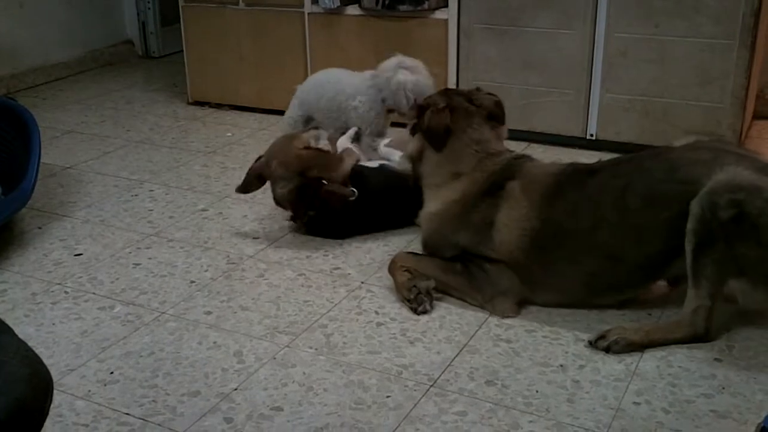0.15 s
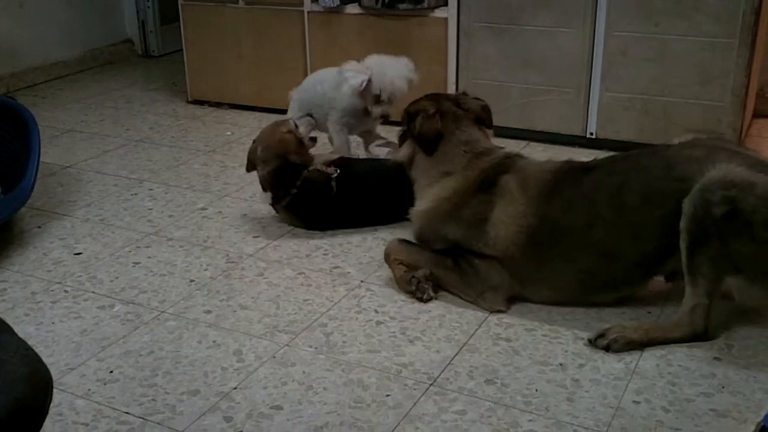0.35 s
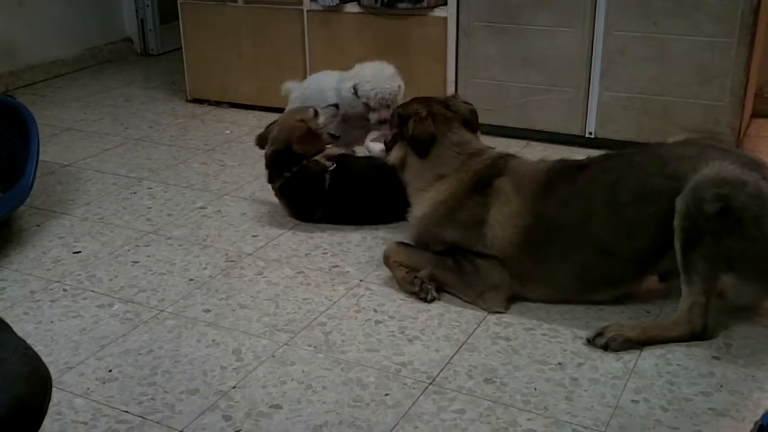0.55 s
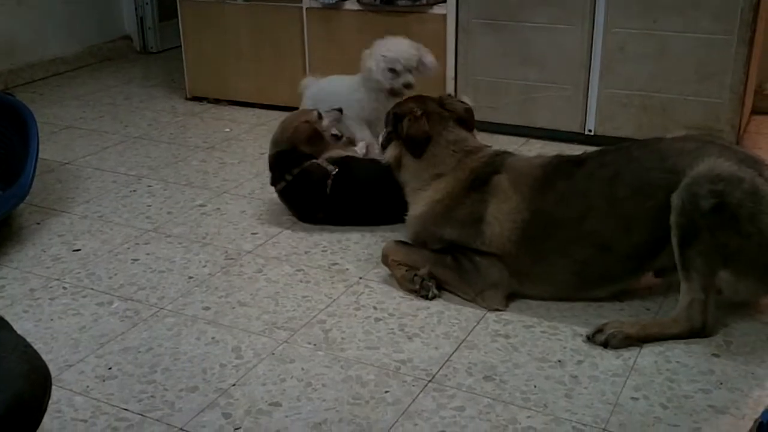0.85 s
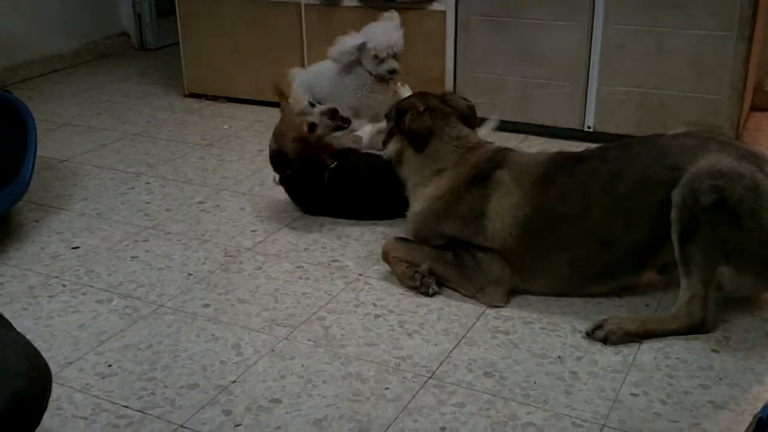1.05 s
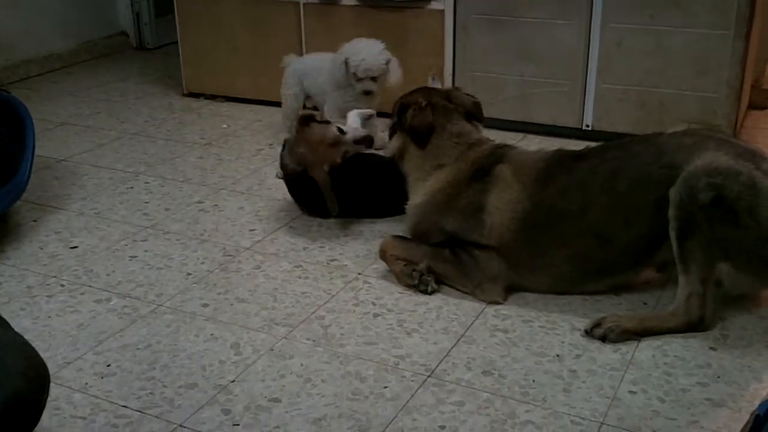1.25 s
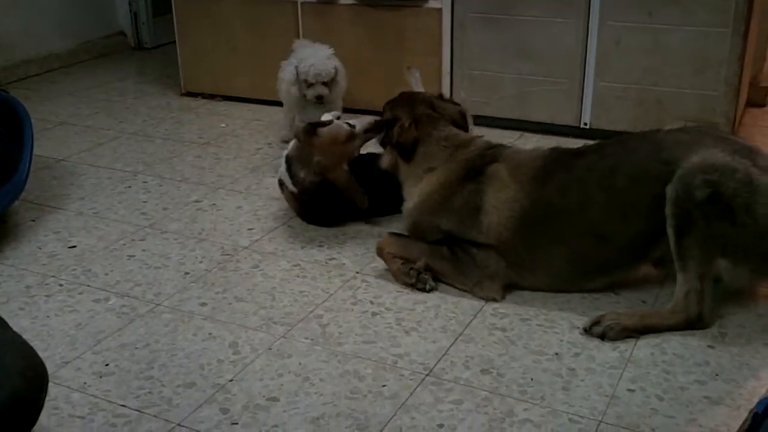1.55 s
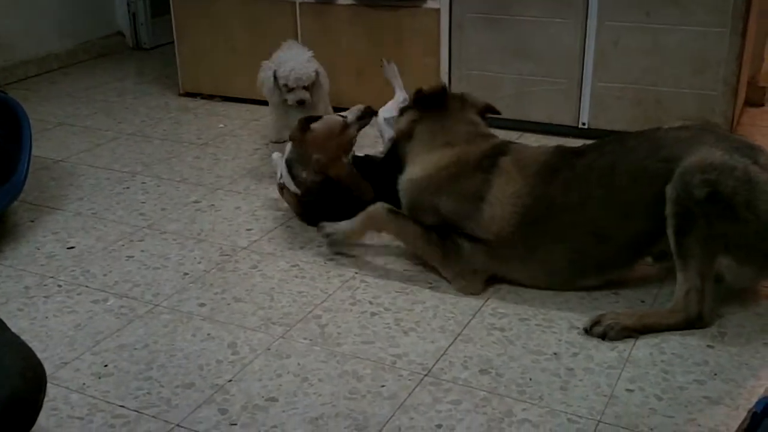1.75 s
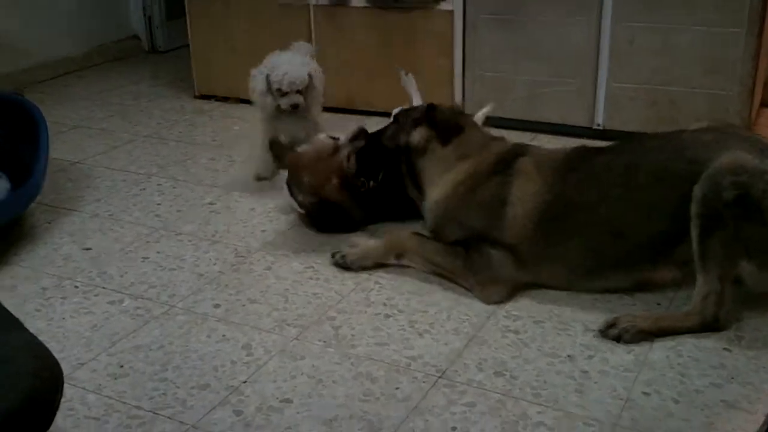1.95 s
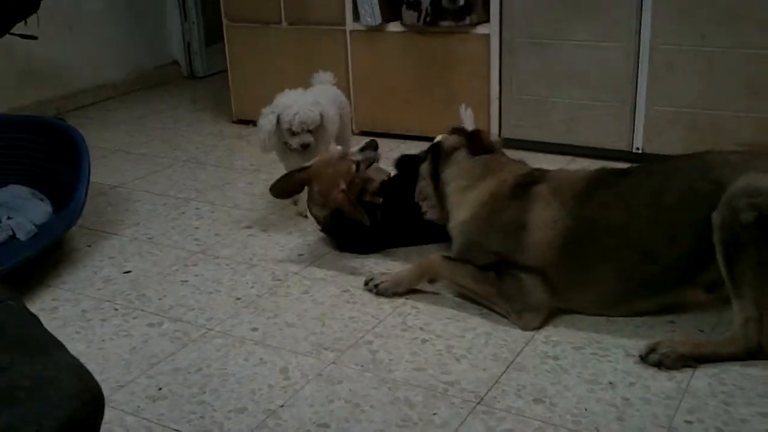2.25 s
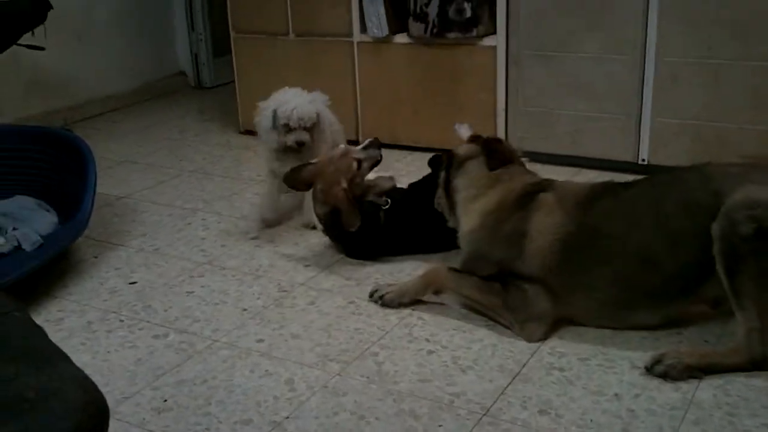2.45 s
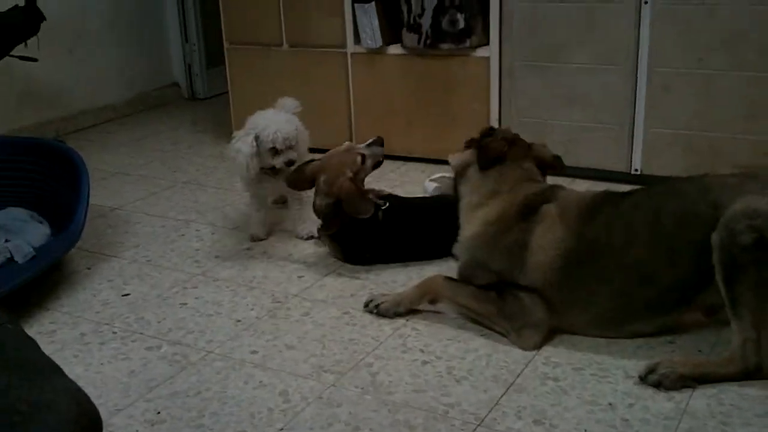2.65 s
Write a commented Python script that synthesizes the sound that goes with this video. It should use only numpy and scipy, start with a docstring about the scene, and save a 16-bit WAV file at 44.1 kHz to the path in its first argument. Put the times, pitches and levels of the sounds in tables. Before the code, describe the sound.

Playful dog growls, one long and one short, over body thumps and a jingling collar tag

```python
"""Dogs wrestling on tiles

In a small hard room one dog growls twice: a long rattle with a thin whine at both ends, then a short growl that
swells and opens into a huff. Vocal pulses and puffs of air drive throat filters. Bodies thump as low swings,
and the rumble has a few low lumps of the same shape; a collar tag rings metal modes; claw clicks, a snort of
breath, huffs and two faint paw scuffles are shaped noise. A hand-held camera adds low rumble, and microphone
notches a hollow colour."""
import sys
import numpy as np
from scipy import signal
from scipy.fft import rfft, irfft, next_fast_len
from scipy.io import wavfile
from scipy.ndimage import uniform_filter1d, map_coordinates

SR = 44100
rng = np.random.default_rng(int(sys.argv[2]) if len(sys.argv) > 2 else 0)


def digitize_waveform(pressure):
    """Quantize a signal to 16-bit integers and store it at the path in sys.argv[1].

    Rows of a 2-D input are taken as channels; values are limited to [-1, 1].
    """
    field = np.atleast_2d(pressure).T
    bounded = np.clip(field, -1, 1)
    quanta = np.round(bounded * 32767).astype(np.int16)
    wavfile.write(sys.argv[1], SR, quanta)


N = 123479


def amp(db):
    """Decibels to gain."""
    return 10 ** (np.asarray(db) / 20)


def unit(x):
    """Scale to rms 1."""
    return x / np.sqrt(np.mean(x ** 2) + 1e-20)


def decay(t, t60_s):
    """Exponential decay, 60 dB down after t60_s."""
    return np.exp(-np.log(1000) * t / t60_s)


def along(points, hz):
    """Interpolate (Hz, value) points on a log frequency axis."""
    f, v = np.transpose(points)
    return np.interp(np.log(hz + 1), np.log(f + 1), v)


def curves(rows):
    """One value per sample for each column after the time."""
    time_s, *columns = np.transpose(rows)
    return [np.interp(np.arange(N) / SR, time_s, c) for c in columns]


def during(rows):
    """Soft-edged gate over the span of a curve."""
    t = np.arange(N) / SR
    inside = (t > rows[0][0]) & (t < rows[-1][0])
    return uniform_filter1d(1. * inside, size=200)


def filtered(x, response):
    """Multiply the spectrum of x by a response of frequency."""
    size = next_fast_len(N + SR // 2)
    return irfft(rfft(x, size) * response(np.fft.rfftfreq(size, 1 / SR)), size)[:N]


def coloured(x, points):
    """Minimum-phase filter of unit energy with the given (Hz, dB) spectrum, via the folded cepstrum."""
    size = 8192
    cepstrum = irfft(np.log(amp(along(points, np.fft.rfftfreq(size, 1 / SR)))))
    cepstrum[1:size // 2] *= 2
    cepstrum[size // 2 + 1:] = 0
    impulse = irfft(np.exp(rfft(cepstrum)))
    return signal.fftconvolve(x, impulse / np.linalg.norm(impulse))[:N]


def noise(points):
    """Coloured noise of rms 1."""
    return unit(coloured(rng.standard_normal(N), points))


def wobble(rate_hz, size=N):
    """Smooth random curve through rate_hz knots a second."""
    knots = rng.standard_normal(int(size * rate_hz / SR) + 4)
    return map_coordinates(knots, [np.arange(size) * rate_hz / SR])


def room(x, wet_db):
    """Direct sound plus a hard-room tail of decaying noise, scaled to the same nominal power."""
    # room decay: freq_hz, t60_s
    room_t60 = [(150, 0.31), (700, 0.32), (2500, .38), (6000, 0.25), (14000, 0.18)]
    hz, t, bins = signal.stft(rng.standard_normal(SR // 2), SR, nperseg=256)
    bins = bins * amp(-60 * t / along(room_t60, hz)[:, None])
    tail = signal.istft(bins, SR, nperseg=256)[1]
    tail = np.pad(tail / np.linalg.norm(tail), (90, 0))  # 2 ms pre-delay
    wet = signal.fftconvolve(x, tail)[:N]
    return (x + amp(wet_db) * wet) / np.hypot(1, amp(wet_db))


def background():
    """Room air and lumpy hand-held camera rumble: coloured noise at slowly wandering levels."""
    # spectra: freq_hz, relative_db
    air_colour = [(100, 11), (300, 1.5), (500, 1), (800, 2), (1200, 0.5), (2000, -6.5), (3200, -10),
                  (4800, -11.5), (6000, -20), (9000, -29), (15000, -32)]
    rumble_colour = [(4, -35), (14, 2), (25, 2.5), (50, -2), (80, -6.5), (120, -17), (200, -26), (400, -42),
                     (1000, -79)]
    # levels: time_s, level_db
    air_db, = curves([(0, -48.5), (1.1, -48.5), (1.5, -47.5), (2.15, -49.5), (2.8, -48)])
    rumble_db, = curves([(0, -26), (.1, -35), (.27, -37.5), (.48, -39.5), (.62, -38.5), (.78, -37.5),
                         (.95, -34.5), (1.18, -41), (1.27, -29), (1.5, -42), (1.62, -31), (2.0, -35.5),
                         (2.12, -39), (2.4, -37.5), (2.56, -35), (2.8, -43.5)])
    air = amp(air_db + 1.2 * wobble(14)) * noise(air_colour)
    rumble = amp(rumble_db + 1.5 * wobble(16)) * noise(rumble_colour)
    return air + rumble


def snort():
    """A dog snorts a short breath: noise with a fast random level gives the grain."""
    # snort level: time_s, level_db
    snort_level = [(.2, -72), (.26, -46.5), (.31, -44.5), (.345, -47.5), (.39, -65)]
    # snort spectrum: freq_hz, relative_db
    snort_colour = [(800, -14), (2000, -3.5), (3300, 3), (4400, 6.5), (6000, -7), (9500, -13), (13000, -14),
                    (15500, -27)]
    level_db, = curves(snort_level)
    breath = during(snort_level) * amp(level_db + 1.1 * wobble(119.6)) * noise(snort_colour)
    return room(breath, wet_db=-4.5)


def clicks():
    """Claws and teeth crack: noise bursts that die within milliseconds."""
    # claw and tooth clicks: start_s, relative_db
    click_hits = [(0.167, -40), (0.4561, -29), (.5566, -44), (0.7577, -31), (0.769, -42.5), (.845, -35),
                  (.872, -33), (1.0286, -43), (1.1468, -49), (1.763, -19), (1.773, -33)]
    # click spectrum: freq_hz, relative_db
    click_colour = [(500, -17), (2000, 0), (3300, 1.5), (4500, 7), (6000, -4), (7500, -6), (10000, -7),
                    (14000, -10), (15500, -14)]
    out, t = np.zeros(N + SR), np.arange(SR // 10) / SR
    for start_s, relative_db in click_hits:
        burst = decay(t, t60_s=0.0039) * rng.standard_normal(len(t))
        out[round(start_s * SR):][:len(t)] += amp(relative_db - 4) * burst
    return room(coloured(out[:N], click_colour), wet_db=1.5)


def tag():
    """Each strike scrapes the collar tag on its ring and rings its modes; swinging blurs their phase."""
    # strikes: start_s, level_db, upper_modes_db
    tag_hits = [(.185, -57, 9.5), (.527, -44, 0), (.56, -41.5, 8.5), (.575, -41.5, 2), (.689, -44, -4),
                (0.744, -47.5, 4.5), (0.796, -53, 1), (0.829, -50.5, 1), (0.899, -50, 0), (0.94, -55.5, 8),
                (1.03, -38.5, -13), (1.045, -48.5, 3), (1.1432, -40.5, 1), (1.193, -51, -3),
                (1.236, -54, -10), (1.3, -59.5, -2), (1.376, -58, -1), (1.841, -59, 5)]
    # tag modes, the low pair first: freq_hz, relative_db, t60_s
    tag_modes = [(4598, -4.5, 0.17), (4630, 2.5, .22), (4861, -4.5, 0.11), (4990, -15, 0.09),
                 (11220, -18, .13), (11886, -14, .13)]
    # scrape spectrum: freq_hz, relative_db
    scrape_colour = [(2000, -24), (4200, -7), (4700, 10), (5200, -5), (6000, 5.5), (6700, -3), (7500, -21),
                     (10500, -28), (12000, -22), (13000, -30)]
    attack_s, blur_cycles, flicker_db = 0.00086, 0.056, 2.5
    scrape_db, scrape_t60_s = -9.5, .08
    rings, scrape, t = np.zeros(N + SR), np.zeros(N + SR), np.arange(SR // 2) / SR
    for start_s, hit_db, upper_db in tag_hits:
        start = round(start_s * SR)
        for k, (hz, mode_db, t60_s) in enumerate(tag_modes):
            cycles = hz * t + rng.random() + blur_cycles * wobble(205, size=len(t))
            envelope = decay(t, t60_s) * (1 - np.exp(-t / attack_s))
            flicker = amp(flicker_db * wobble(122, size=len(t)))
            gain = amp(hit_db + mode_db + upper_db * (k > 1) + rng.normal(0, 1.1))
            rings[start:][:len(t)] += gain * envelope * flicker * np.sin(2 * np.pi * cycles)
        burst = decay(t, scrape_t60_s) * rng.standard_normal(len(t))
        scrape[start:][:len(t)] += amp(hit_db + scrape_db) * burst
    return room(rings[:N] + coloured(scrape[:N], scrape_colour), wet_db=-5)


def thumps():
    """Soft bodies land on the floor, and the hand-held camera's rumble has low lumps: a brief swing under a
    Gaussian, with no ring."""
    # body thumps and low rumble lumps: centre_s, peak_db, pitch_hz
    thump_hits = [(0.109, -27.5, 35.4), (.168, -27, 30.3), (0.361, -25.5, 208), (0.368, -32, 48.6),
                  (0.559, -34, 92), (.65, -25.5, 52.4), (.84, -30.5, 60), (0.904, -25.5, 86),
                  (.918, -22.5, 103), (1.08, -25, 44.4), (1.253, -23.5, 54.3), (1.297, -24, 65.3),
                  (1.323, -14.5, 90), (1.326, -25.5, 234), (1.821, -23, 49), (2.015, -17.5, 51.6),
                  (2.015, -22.5, 148), (2.016, -25, 319), (2.042, -20.5, 40.7), (2.155, -28, 65),
                  (2.481, -24.5, 199.6), (2.487, -17, 158), (2.49, -31.5, 305), (2.505, -18, 45.6),
                  (2.544, -33.5, 68.3)]
    sigma_cycles = 0.4
    t, out = np.arange(N) / SR, np.zeros(N)
    for centre_s, peak_db, hz in thump_hits:
        cycles = (t - centre_s) * hz
        out -= amp(peak_db) * np.cos(2 * np.pi * cycles) * np.exp(-.5 * (cycles / sigma_cycles) ** 2)
    return out


def huffs_and_scuffles():
    """Huffs through open jaws, two faint paw scuffles at 0.8 and 1.05 s: noise under lopsided Gaussian swells."""
    # huffs and paw scuffles: peak_s, level_db, rise_sigma_s, fall_sigma_s
    swells = [(.8, -59, 0.041, 0.036), (1.05, -53, .025, 0.049), (1.66, -49.5, 0.057, 0.045),
              (1.955, -47, .02, 0.018), (2.412, -34, .02, 0.031), (2.68, -47.5, 0.038, 0.0271)]
    # their shared spectrum: freq_hz, relative_db
    swell_colour = [(400, -4), (800, 15.5), (1400, 1), (1950, 5.5), (3000, 2), (4500, -5.5), (6000, -14.5),
                    (9000, -31), (15000, -37)]
    t, envelope = np.arange(N) / SR, np.zeros(N)
    for peak_s, level_db, rise_s, fall_s in swells:
        sigma_s = np.where(t < peak_s, rise_s, fall_s)
        envelope += amp(level_db) * np.exp(-.5 * ((t - peak_s) / sigma_s) ** 2)
    return room(envelope * noise(swell_colour), wet_db=-1)


def whines():
    """A second, much higher throat vibration glides briefly: harmonics of one jittered pitch."""
    # whines at both ends of the long growl: start_s, length_s, start_hz, end_hz, level_db
    whine_rows = [(1.279, 0.17, 371.8, 367.6, -44.5), (1.94, .045, 339.9, 396.5, -37.5)]
    # harmonics: multiple, relative_db
    whine_partials = [(1, -10), (2, 1), (3, 2), (4, -32), (5, -22), (6, -13)]
    t, out = np.arange(N) / SR, np.zeros(N)
    for start_s, length_s, start_hz, end_hz, level_db in whine_rows:
        progress = np.clip((t - start_s) / length_s, 0, 1)
        hz = (start_hz + (end_hz - start_hz) * progress) * (1 + 0.0144 * wobble(150))
        cycles = np.cumsum(hz) / SR
        tone = sum(amp(db) * np.sin(2 * np.pi * round(k) * cycles) for k, db in whine_partials)
        out += amp(level_db) * np.sin(np.pi * progress) * tone
    return room(out, wet_db=-3.5)


def growl(pitch, effort, mouth, jitter, scatter_db, rasp_db, wet_db):
    """Slow uneven vocal pulses and air puffs ring the throat; open mouth adds rasp, chest a low tone."""
    # throat resonances, relaxed and tense: freq_hz, relative_db
    relaxed_throat = [(100, -22.5), (200, -7.5), (270, -14.5), (400, -11), (500, 0.5), (595, -6.5),
                      (665, 3.5), (790, -9.5), (900, -9.5), (1010, -6.5), (1200, -22), (1700, -25),
                      (3000, -49.5), (8000, -79)]
    tense_throat = [(100, -28.5), (250, -24.5), (335, -11), (420, -22.5), (505, -8), (590, -12.5), (666, 4),
                    (730, -5), (830, -25.5), (1050, -16), (1300, -26), (3000, -60.5), (8000, -90)]
    # what the chest passes of the lowest harmonics: freq_hz, gain_db
    chest = [(58, -18), (73, -6.5), (83, 1), (105, -6), (125, -2), (150, -2.5), (178, -3), (215, -15),
             (255, -25.5), (335, -11), (400, -26.5)]
    hz, = curves(pitch)
    level_db, chest_db, rough, open_db, tense = curves(effort)
    rough, tense, gate = np.clip(rough, 0, 1), np.clip(tense, 0, 1), during(effort)

    started = np.arange(N) / SR > pitch[0][0]
    cycles = np.cumsum(started * hz * (1 + jitter * rough * wobble(70))) / SR + .5
    at = np.flatnonzero(np.diff(np.floor(cycles)) > 0)
    pulses = np.zeros(N)
    # sqrt(period) keeps the power independent of pitch
    pulses[at] = np.sqrt(SR / hz[at]) * amp(scatter_db * rng.standard_normal(len(at)))

    def puffs():
        """Noise that bursts and fades in every vocal cycle."""
        return 2.7 * np.exp(-4 * (cycles % 1)) * rng.standard_normal(N)

    folds = gate * amp(level_db) * (np.sqrt(1 - rough) * pulses + np.sqrt(rough) * puffs())
    voice = coloured((1 - tense) * folds, relaxed_throat) + coloured(tense * folds, tense_throat)
    rasp_source = gate * amp(level_db + open_db + rasp_db) * (0.4 * pulses + 0.75 * puffs())
    rasp = coloured(rasp_source, mouth)

    chest_tone = np.zeros(N)
    for k in range(1, 6):
        gain = amp(along(chest, k * hz) + 1.18 * wobble(25))
        chest_tone += gain * np.sqrt(2) * np.sin(2 * np.pi * (k * cycles + rng.random()))
    return room(voice, wet_db) + room(rasp, wet_db=5.5) + gate * amp(chest_db) * chest_tone


def scene():
    """Both growls over the scuffle."""
    # pitch: time_s, pitch_hz
    long_pitch = [(1.3, 52.16), (1.38, 57.26), (1.45, 61.05), (1.52, 65.82), (1.58, 69.83), (1.64, 77.36),
                  (1.7, 73.03), (1.76, 75.79), (1.81, 71.7), (1.9, 73.16), (1.99, 73.05)]
    short_pitch = [(2.21, 56.84), (2.26, 57.77), (2.29, 79.94), (2.32, 86.63), (2.35, 83.47), (2.39, 82.35),
                   (2.46, 81.9)]
    # effort: time_s, level_db, chest_tone_db, roughness_0_1, mouth_opening_db, throat_tension_0_1
    long_effort = [(1.29, -50, -51, 0.26, -8, 0), (1.352, -39, -41, .2, -2, 0.3),
                   (1.439, -33, -40.5, 0.19, -3.5, 0.2), (1.542, -37, -39, 0.31, -3, 0),
                   (1.66, -33.5, -35, .35, 1, 0), (1.75, -37.5, -36.5, 0.09, -2.5, 0.14),
                   (1.789, -47.5, -41, .15, 5.5, 0), (1.89, -32, -39.5, 0.12, -5.5, 0.2),
                   (1.959, -38.5, -50, 0.46, 1.5, .1), (1.99, -84, -46, 0.48, -22, 0.07)]
    short_effort = [(2.207, -48.5, -50, 0.06, -9, 0.5), (2.222, -34, -41, .05, -17, 0.6),
                    (2.261, -36, -36, 0.17, 0, 0.8), (2.305, -29, -33.5, 0.25, -5.5, 1),
                    (2.329, -32, -34, 0.09, -1.5, .9), (2.365, -18.5, -33, .05, -10, 1),
                    (2.404, -40.5, -37.5, .15, 6.5, 0.9), (2.459, -52.5, -42, 0.65, 12, 1)]
    # open-mouth rasp spectra: freq_hz, relative_db
    long_mouth = [(500, -32.5), (850, 2.5), (1020, 4.5), (1280, -4), (1550, 8.5), (1850, 1), (2300, -2),
                  (3000, -11), (3700, -8.5), (4700, -17), (6500, -24.5), (9500, -30), (15000, -36)]
    short_mouth = [(500, -44), (850, -4), (1100, 5), (1260, -3.5), (1410, 3.5), (1700, -0.5), (1870, 6),
                   (2050, -3.5), (2270, 2.5), (3000, -11.5), (4600, -23.5), (6500, -21), (9000, -30.5),
                   (15000, -35)]
    scuffle = background() + snort() + clicks() + tag() + thumps() + huffs_and_scuffles()
    long = growl(long_pitch, long_effort, long_mouth, jitter=.2, scatter_db=2.0, rasp_db=-9.5, wet_db=0.5)
    short = growl(short_pitch, short_effort, short_mouth, jitter=.1, scatter_db=1.3, rasp_db=-5.5, wet_db=-4)
    return (scuffle + whines() + long + short)[None]


def record(dry):
    """The microphone cuts narrow notches; nothing passes above the band limit."""
    # notches: centre_hz, width_hz (of the curve before steepness)
    notches = [(2730, 346), (5520, 400), (7950, 910), (10930, 410)]
    steepness, top_hz = 1.13, 15450

    def response(f):
        """Product of the notches below the band limit."""
        dips = [np.abs(f - hz) / np.hypot(f - hz, width_hz) for hz, width_hz in notches]
        return np.prod(dips, axis=0) ** steepness * (f < top_hz)

    return filtered(dry[0], response)[None]


dry = scene()
out = record(dry)
digitize_waveform(out)
```